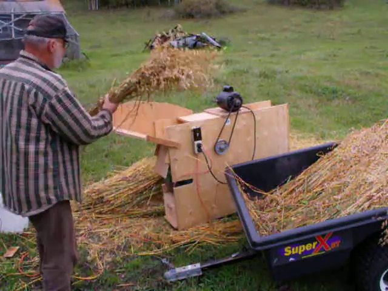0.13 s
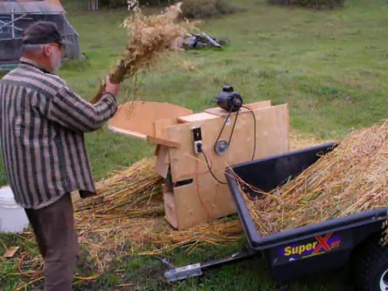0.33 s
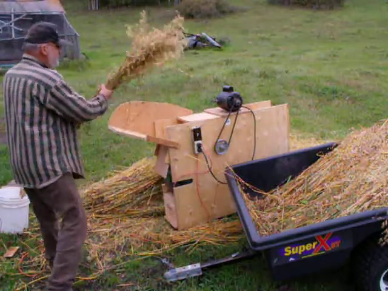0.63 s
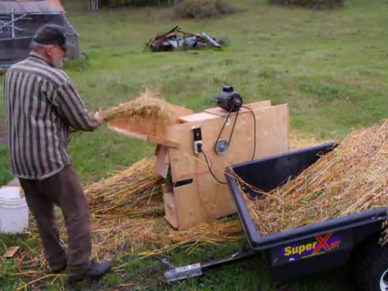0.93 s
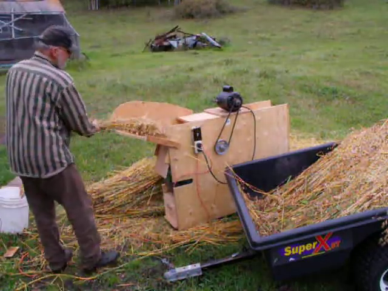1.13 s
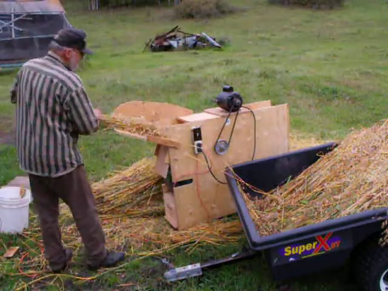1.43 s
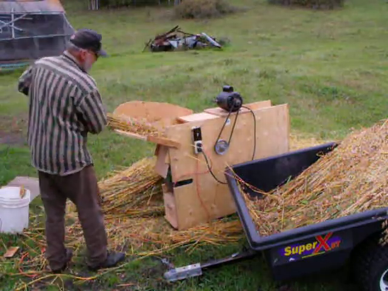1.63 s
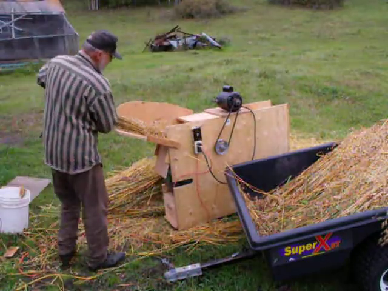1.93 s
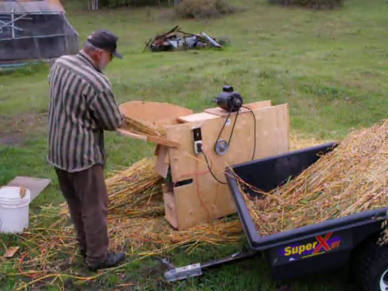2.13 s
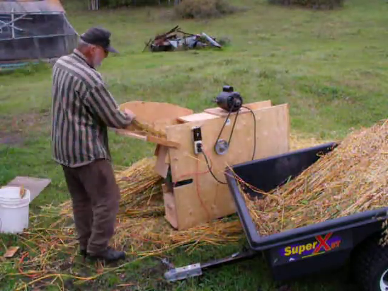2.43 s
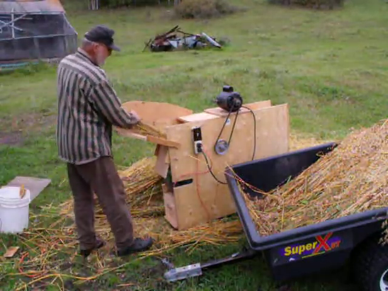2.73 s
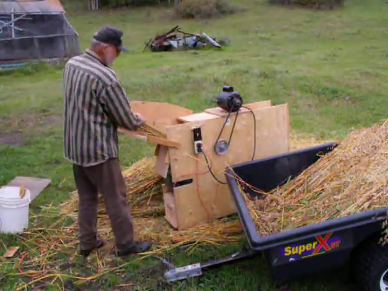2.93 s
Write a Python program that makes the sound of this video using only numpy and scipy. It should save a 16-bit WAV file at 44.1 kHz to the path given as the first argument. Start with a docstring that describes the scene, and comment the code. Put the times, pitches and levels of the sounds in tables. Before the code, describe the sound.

A plywood thresher rattles and knocks unevenly over a faint motor hum, grains ticking on its walls; near the end a sheaf crackles and thuds inside, much louder. Open field, light wind on a dull mono microphone.

```python
"""A home-made plywood thresher runs in an open field: its beaters knock and rattle, ringing the box.
Loose grains tick on the walls; near the end a sheaf goes in, crackling and thudding as the blows grow heavier.
Knocks, ticks and snaps are random clicks through filters, with noise for first contacts and the loaded thud.
Wavering sines hum for the electric motor and belt; filtered noise is the wind, brushing the microphone
mostly at the start."""
import sys
import numpy as np
from scipy import signal
from scipy.fft import rfft, irfft
from scipy.io import wavfile

SR = 44100
rng = np.random.default_rng(int(sys.argv[2]) if len(sys.argv) > 2 else 0)


def transcribe(signal):
    """Save signal, clipped to [-1, 1], as a 16-bit WAV file at the path in sys.argv[1]."""
    frames = np.atleast_2d(signal).T
    limited = np.clip(frames, -1, 1)
    pcm = np.round(limited * 32767).astype(np.int16)
    wavfile.write(sys.argv[1], SR, pcm)


N = 136710
TIME = np.arange(N) / SR
FREQ = np.fft.rfftfreq(8192, 1 / SR)
BURST_TIME = np.arange(SR // 6) / SR


def amp(db):
    """Decibels to gain."""
    return 10 ** (np.asarray(db) / 20)


def unit(x):
    """Scales to rms 1."""
    return x / np.sqrt(np.mean(x ** 2) + 1e-20)


def shape(points):
    """A spectrum in dB, joined by straight lines on a log-frequency axis."""
    hz, db = np.transpose(points)
    return np.interp(np.log(FREQ + 1), np.log(hz + 1), db)


def colour(x, db):
    """Causal minimum-phase filter with the given gain curve."""
    log_gain = np.log(amp(np.r_[db, db[-2:0:-1]]))
    response = np.exp(np.conj(signal.hilbert(log_gain)))
    taps = np.fft.ifft(response).real[:len(FREQ)]
    return signal.fftconvolve(x, taps)[:len(x)]


def add(mix, start_s, sound):
    """Mixes a sound in at a time."""
    part = mix[max(round(start_s * SR), 0):][:len(sound)]
    part += sound[:len(part)]


def drift(hz):
    """Slow random wander, rms 1."""
    f = np.fft.rfftfreq(N, 1 / SR)
    spectrum = rfft(rng.standard_normal(N)) * np.exp(-(f / hz) ** 2)
    return unit(irfft(spectrum, N))


def clicks(per_s, spread_db, size):
    """Random tiny impacts of either sign; a few are large."""
    chance, strength, side = rng.random((3, size))
    strength = np.minimum(-np.log(1 - strength), 4)
    return (chance < per_s / SR) * np.sign(side - 0.5) * amp(spread_db * strength)


STRIKE_S = 0.0023  # decay of the first contact
BURST_S = 0.02  # each burst carries as much energy as this long at rms 1


def burst(per_s, strike, rise_s, hold_s, decay_s, db):
    """A brief scraping contact and a flurry of rebounds, both through the same filter."""
    t = BURST_TIME
    envelope = np.minimum(t / rise_s, 1) * np.exp(-np.maximum(t - hold_s, 0) / decay_s)
    flurry = colour(clicks(per_s, 1, len(t)) * envelope, db)
    contact = colour(rng.standard_normal(len(t)) * np.exp(-t / STRIKE_S), db)
    both = unit(flurry) + strike * unit(contact)
    return unit(both) * np.sqrt(BURST_S / t[-1])


# Soft buffets on the microphone. Each row: centre in seconds, time to fall to 1/e in seconds, level in dB.
WIND_GUSTS = [(.075,0.031,-28.5),(0.251,0.04,-29),(.365,0.059,-27.5),(.98,0.032,-46),(1.59,0.024,-31)]
# Colour of the wind, low and dull. Each row: frequency in Hz, relative level in dB.
WIND_COLOUR = [(10,-12.5),(35,-4.5),(55,-10.5),(95,-6),(150,-16.5),(400,-30.5),(1500,-73)]
BREEZE_DB = -46.5


def wind():
    """A light breeze of low filtered noise, swelling in a few soft buffets on the microphone."""
    level = amp(BREEZE_DB)
    for centre_s, half_s, db in WIND_GUSTS:
        level = level + amp(db) * np.exp(-((TIME - centre_s) / half_s) ** 2)
    return level * unit(colour(rng.standard_normal(N), shape(WIND_COLOUR)))


# Steady tones of motor and belt. Each row: frequency in Hz, rms level in dB.
MOTOR_TONES = [(65,-51),(108,-48.5),(120,-41),(131,-44.5)]
HUM_WAVER_RAD, HUM_WAVER_HZ = 0.22, 5.5  # rms phase wander and how fast it moves


def motor():
    """Low tones of the motor and its belt drive, each wavering slightly in phase."""
    hum = np.zeros(N)
    for hz, db in MOTOR_TONES:
        waver = HUM_WAVER_RAD * drift(HUM_WAVER_HZ)
        phase = 2 * np.pi * (hz * TIME + rng.random()) + waver
        hum += amp(db) * np.sqrt(2) * np.sin(phase)
    return hum


INSIDE_DB, INSIDE_T60_S = -8, 0.072
INSIDE_STEP_S = 0.003  # time between one tail and the next


def inside(x, count=16):
    """Short treble reflections in the box, smeared through a ring of random tails for an even tone."""
    highpass = signal.butter(2, 1200, "high", fs=SR, output="sos")
    treble = signal.sosfilt(highpass, x)
    out = np.zeros(N)
    for k in range(count):
        # overlapping humps pass the sound round the ring
        window = np.sin(np.pi / 2 * np.minimum((TIME / INSIDE_STEP_S - k) % count, 2))
        tail = rng.standard_normal(len(BURST_TIME)) * amp(-60 * BURST_TIME / INSIDE_T60_S)
        out += signal.fftconvolve(treble * window, tail / np.linalg.norm(tail))[:N]
    return amp(INSIDE_DB) * out


# Sprays of grain against the walls. Each row: start in seconds, level in dB before SPRAY_DB is added.
GRAIN_SPRAYS = [(0.157, -18.5), (0.2803, -19.5), (0.3101, -19), (0.4539, -22.5), (0.501, -18.5),
                (0.8033, -19.5), (0.8636, -18), (0.9088, -19), (0.9885, -20), (1.1498, -15), (1.488, -17.5),
                (1.7003, -22), (1.9639, -20), (2.2759, -13), (2.544, -8.5), (2.666, -7.5), (2.8257, -8)]
# Bright tick of kernels on the walls. Each row: frequency in Hz, relative level in dB.
GRAIN_COLOUR = [(200,-20),(1000,-8),(2000,-2),(3200,1.5),(4300,-0.5),(5000,.5),(6000,-0.5)]
GRAIN_DB, GRAIN_PER_S, GRAIN_SPREAD_DB = -30, 2600, 3.3
SPRAY_DB, SPRAY_CLICKS_PER_S = -5.5, 5400
SPRAY_STRIKE = 0.45  # first contact against the flurry that follows it
SPRAY_RISE_S, SPRAY_HOLD_S, SPRAY_DECAY_S = 0.001, 0.005, 0.0062


def grain():
    """Loose kernels tick on the walls as random clicks, now and then a whole spray at once."""
    tone = shape(GRAIN_COLOUR)
    out = amp(GRAIN_DB) * unit(colour(clicks(GRAIN_PER_S, GRAIN_SPREAD_DB, N), tone))
    for start_s, db in GRAIN_SPRAYS:
        spray = burst(SPRAY_CLICKS_PER_S, SPRAY_STRIKE, SPRAY_RISE_S, SPRAY_HOLD_S, SPRAY_DECAY_S, tone)
        add(out, start_s, amp(db + SPRAY_DB) * spray)
    return out


BEAT_HZ, BEAT_START_S, BEAT_DECAY_S, BEAT_FLOOR = 22.81, 0.0037, 0.072, 1


def beats():
    """Each passing beater stirs the contents, which settle until the next one."""
    since_s = ((TIME - BEAT_START_S) * BEAT_HZ % 1) / BEAT_HZ
    return unit(BEAT_FLOOR + np.exp(-since_s / BEAT_DECAY_S))


# Work on the sheaf, shared with the drum.
# Each row: time in seconds, level of the box rattle in dB, level of the shredding straw in dB.
SHEAF_WORK = [(0,-23,-59),(1.098,-22.5,-58),(2.05,-22.5,-52),(2.28,-22,-37),(2.41,-18,-22.5),(2.53,-22.3,-18.5),(2.7,-19.5,-16.5),(2.9,-20,-14.5),(3.1,-18,-14)]
# Crackle of snapping straw. Each row: frequency in Hz, relative level in dB.
STRAW_COLOUR = [(25,-17),(60,-1.5),(110,9.5),(170,-5.5),(280,2),(600,-4.5),(1000,0),(1300,-3),(1800,2.5),(2400,1),(3500,0.9),(5000,3.1),(6000,-6.5)]
# Low thud of the loaded drum. Each row: frequency in Hz, relative level in dB.
THUD_COLOUR = [(50,-21),(100,-7),(165,-16.5),(235,-3.5),(290,0.5),(340,-3),(450,-16.5),(1000,-34),(3000,-60)]
STRAW_PER_S, STRAW_SPREAD_DB = 10000, 2
THUD_DB, THUD_BEAT = -11, 2.5  # level against the straw, how closely it follows the beaters


def straw():
    """Stalks and ears snap densely as the beaters strip the sheaf, and the loaded drum thuds lower."""
    time_s, _, straw_db = np.transpose(SHEAF_WORK)
    snaps = clicks(STRAW_PER_S, STRAW_SPREAD_DB, N) * beats()
    crackle = unit(colour(snaps, shape(STRAW_COLOUR)))
    thud = unit(colour(rng.standard_normal(N) * beats() ** THUD_BEAT, shape(THUD_COLOUR)))
    return (crackle + amp(THUD_DB) * thud) * amp(np.interp(TIME, time_s, straw_db))


# Broad colour of the plywood housing. Each row: frequency in Hz, relative level in dB.
BOX_COLOUR = [(30,-41.5),(70,-24),(110,-13),(165,-17),(220,-9),(290,-3.5),(480,-3.5),(800,-6),(1300,-14.5),(2200,-18.5),(3200,-21.5),(5200,-23)]
# Resonances of the plywood. Each row: frequency in Hz, width in Hz, lift in dB (negative dips).
BOX_RESONANCES = [(257,11,4),(329,45,4),(401.6,38,8.5),(452.5,57,8),(557,23.6,5),(698,52,7.5),(792,82,5),(990,50,6),(1058,62,7),(1200,33,2),(1443,25,6.5),(1617,75,7.5),(1748,50,8),(1990,120,6.5),(2340,82,-2)]


def box():
    """Response of the plywood housing in dB: a broad colour with resonances on top."""
    response = shape(BOX_COLOUR)
    for hz, width_hz, lift_db in BOX_RESONANCES:
        response = response + lift_db / (1 + (2 * (FREQ - hz) / width_hz) ** 2)
    return response


# Loud knocks of the beaters. Each row: start in seconds, level in dB before KNOCK_DB is added,
# brightness in dB (heard against the average knock), hold of the rebounds before they decay in seconds.
BEATER_KNOCKS = [(0.072, -9, -15.5, 0.011), (0.195, -9, -4, 0.012), (0.244, -11.5, -22, 0.018),
                 (0.272, -4, -17, 0.0085), (0.343, -10, -22, 0.017), (0.409, -6, -18, 0.012),
                 (0.449, -5.5, -8, 0.014), (0.542, -4.5, -23, 0.0062), (0.566, -5.5, -16, 0.0055),
                 (0.626, -8.5, -20.5, 0.01), (0.721, -8, -20, 0.0096), (0.86, -6.5, -25.5, 0.0084),
                 (0.917, -5.5, -13.5, 0.0081), (0.962, -7, -19, 0.0092), (1.045, -5.5, -12.5, 0.0066),
                 (1.057, -11, -30.5, 0.015), (1.084, -5.5, -7, 0.02), (1.126, -4, -22, 0.0041),
                 (1.193, -12, -2, 0.016), (1.257, -5.5, -7, 0.019), (1.317, -1.5, -25, 0.01),
                 (1.407, -6.5, -1.5, 0.011), (1.451, -10, -5.5, 0.0098), (1.531, -3.5, -14.5, 0.027),
                 (1.592, -6.5, -5, 0.0079), (1.679, -4.5, -20, 0.0067), (1.803, -6, -16, 0.019),
                 (1.843, -6, -9, 0.0092), (1.903, -10, -1, 0.012), (1.954, -8, -1, 0.01),
                 (2.075, -5, -9, 0.012), (2.164, -6.5, -11, 0.0075), (2.258, -4, 1, 0.0045),
                 (2.311, -1.5, 1, 0.007), (2.35, -6.5, -10.5, 0.012), (2.44, -2.5, -14, 0.0097),
                 (2.532, -1.5, -7, 0.021), (2.634, 2, 6.5, 0.0083), (2.729, 1.5, -18.5, 0.017),
                 (2.816, 1.5, 1, 0.0073), (2.91, 4.5, -7, 0.012), (2.954, 3.5, -4.5, 0.0077),
                 (3.005, 5, -10.5, 0.011)]
# Extra colour of a knock over the box. Each row: frequency in Hz, gain in dB.
KNOCK_COLOUR = [(100,-8.5),(330,1.5),(500,1.5),(900,3.5),(1800,3),(3000,2.5),(5000,2)]
RATTLE_PER_S, RATTLE_SPREAD_DB = 3000, 2
KNOCK_DB, KNOCK_CLICKS_PER_S = -15, 3000
KNOCK_STRIKE = 0.52  # first contact against the flurry that follows it
KNOCK_RISE_S, KNOCK_DECAY_S = 0.00026, 0.01
KNOCK_BRIGHT_HZ = 1250  # brightness acts mostly above this


def drum():
    """The drum's steady rattle and its heavier knocks, all ringing the box."""
    time_s, rattle_db, _ = np.transpose(SHEAF_WORK)
    wood = box()
    rattle = colour(clicks(RATTLE_PER_S, RATTLE_SPREAD_DB, N) * beats(), wood)
    out = unit(rattle) * amp(np.interp(TIME, time_s, rattle_db))
    upper = FREQ ** 2 / (FREQ ** 2 + KNOCK_BRIGHT_HZ ** 2)
    typical_db = np.mean([row[2] for row in BEATER_KNOCKS])
    for start_s, db, bright_db, hold_s in BEATER_KNOCKS:
        tone = wood + upper * (bright_db - typical_db) + shape(KNOCK_COLOUR)
        knock = burst(KNOCK_CLICKS_PER_S, KNOCK_STRIKE, KNOCK_RISE_S, hold_s, KNOCK_DECAY_S, tone)
        add(out, start_s, amp(db + KNOCK_DB) * knock)
    return out


def scene():
    """The machine with its inner reflections, the motor and the breeze, in mono."""
    machine = drum() + grain() + straw()
    return (machine + inside(machine) + motor() + wind())[None]


# Steep treble roll-off of the microphone. Each row: frequency in Hz, gain in dB.
MIC_RESPONSE = [(10,0),(5050,0),(5400,-6),(5700,-12),(6000,-22),(6200,-37),(6400,-58),(6600,-75),(8000,-95)]
CLIP_LEVEL = 0.72  # of full scale
EDGE_HZ = 15900


def record(dry):
    """A narrow-band microphone, a hard clip for any peak over CLIP_LEVEL, then a low-pass at EDGE_HZ."""
    heard = colour(dry[0], shape(MIC_RESPONSE))
    clipped = np.clip(heard, -CLIP_LEVEL, CLIP_LEVEL)
    lowpass = signal.firwin(511, EDGE_HZ, window=("kaiser", 9), fs=SR)
    return signal.oaconvolve(clipped, lowpass, "same")[None]


dry = scene()
out = record(dry)
transcribe(out)
```